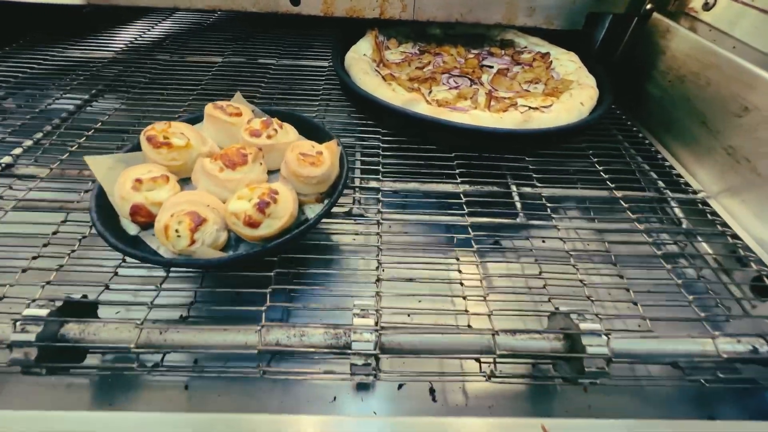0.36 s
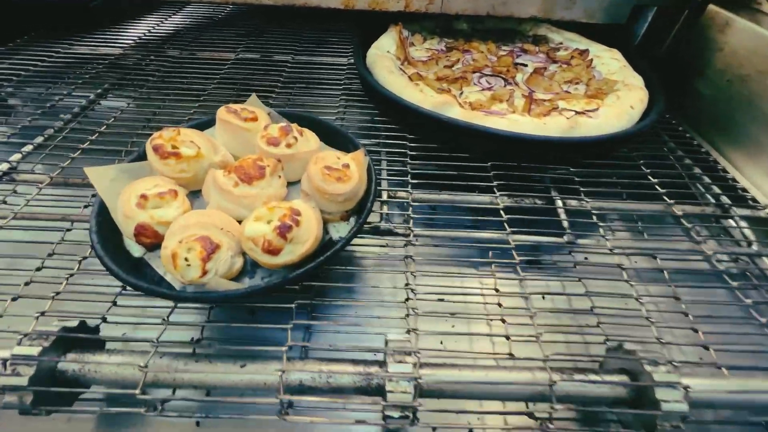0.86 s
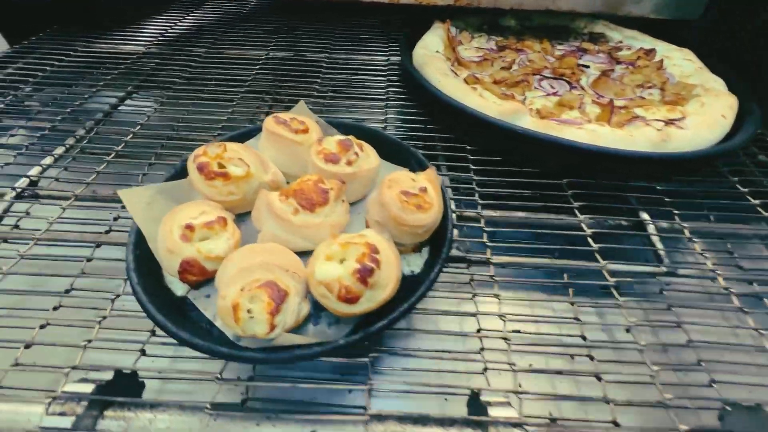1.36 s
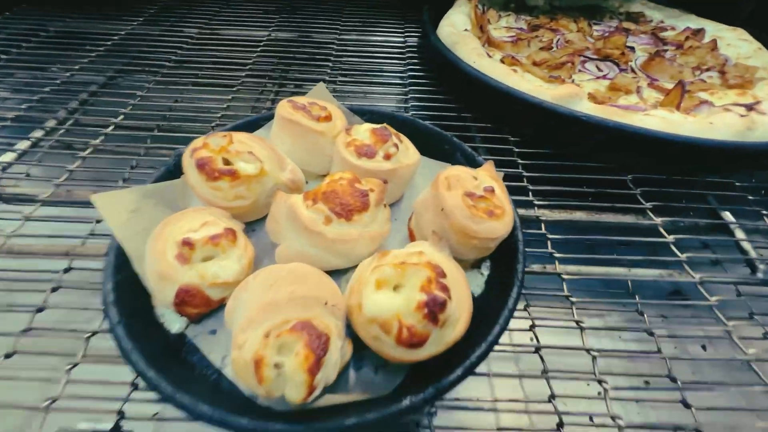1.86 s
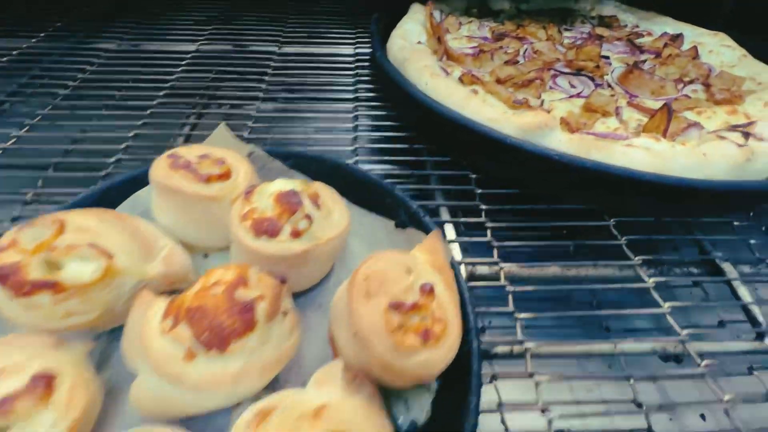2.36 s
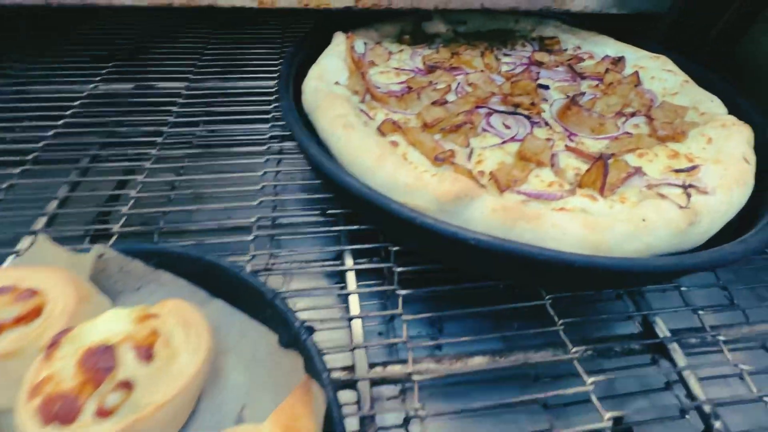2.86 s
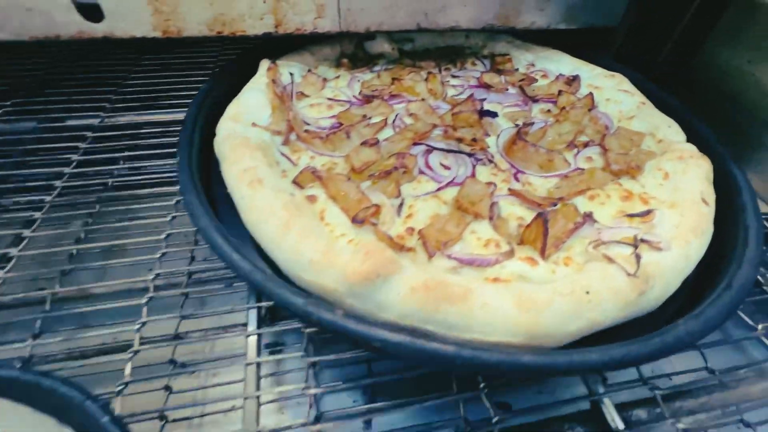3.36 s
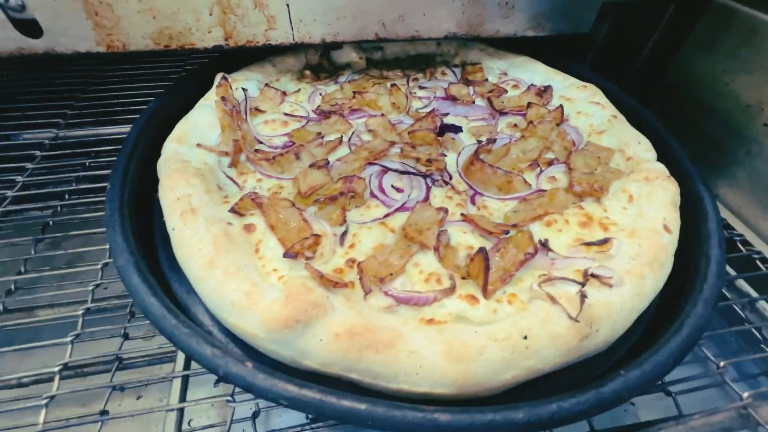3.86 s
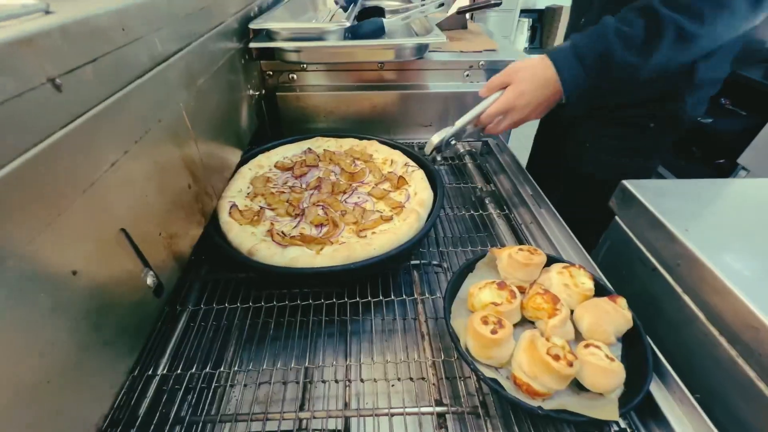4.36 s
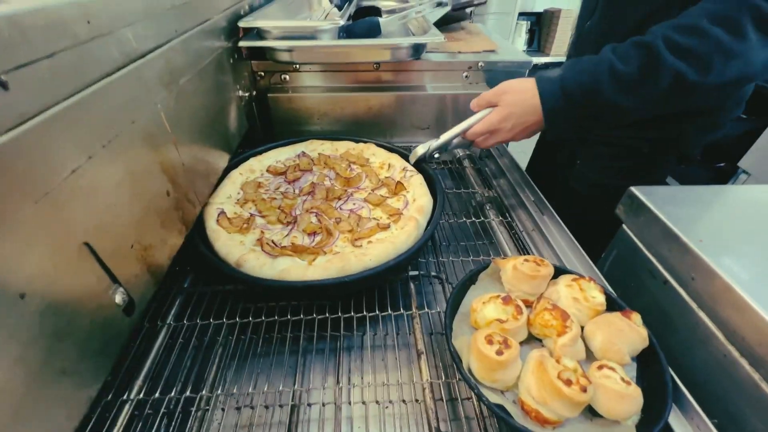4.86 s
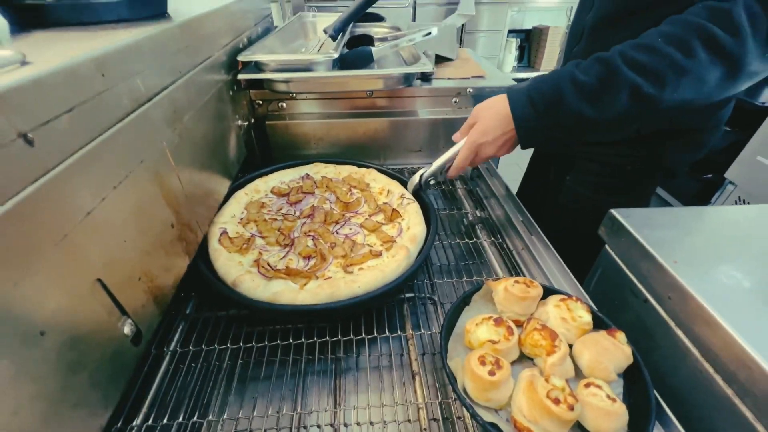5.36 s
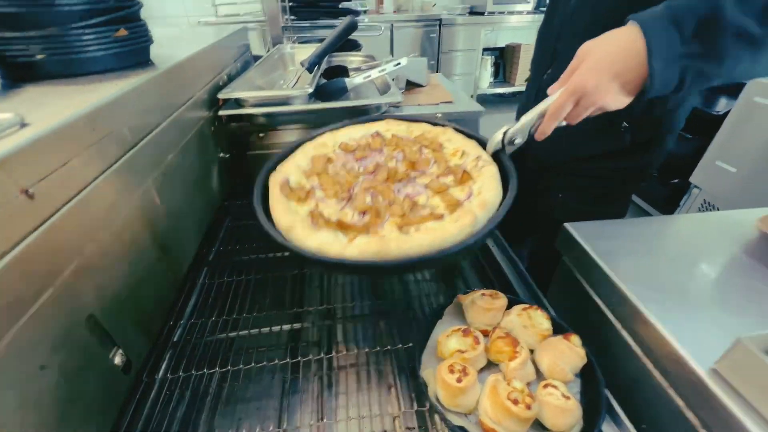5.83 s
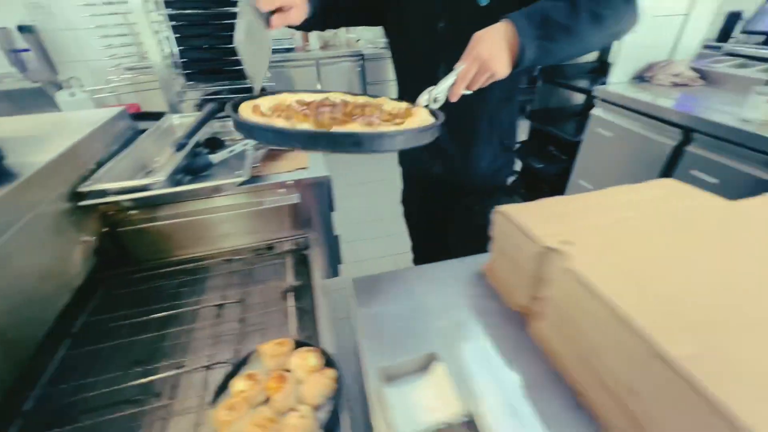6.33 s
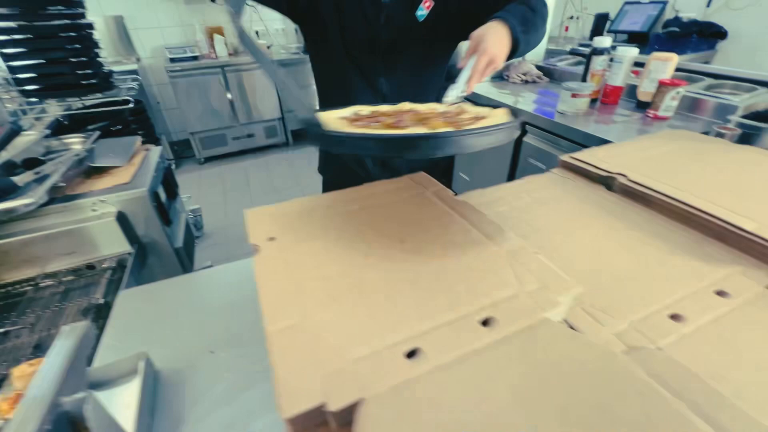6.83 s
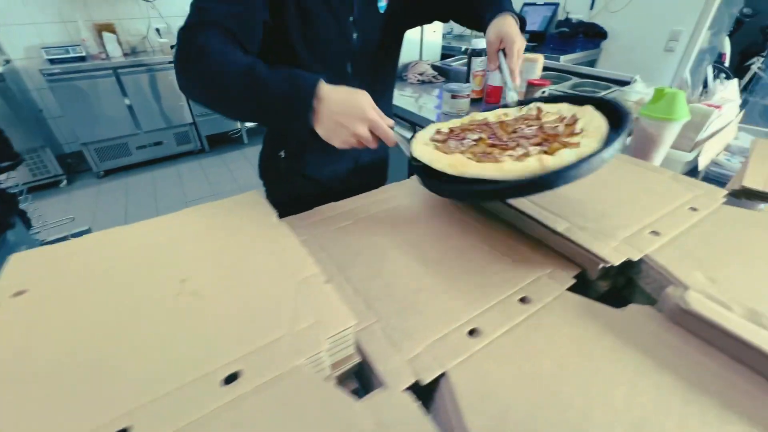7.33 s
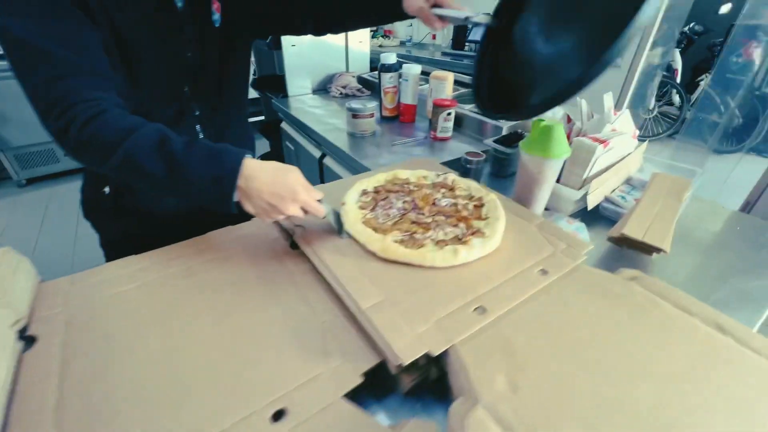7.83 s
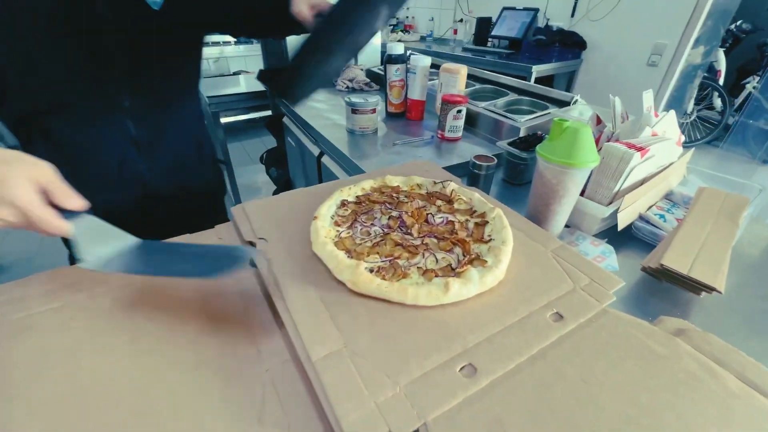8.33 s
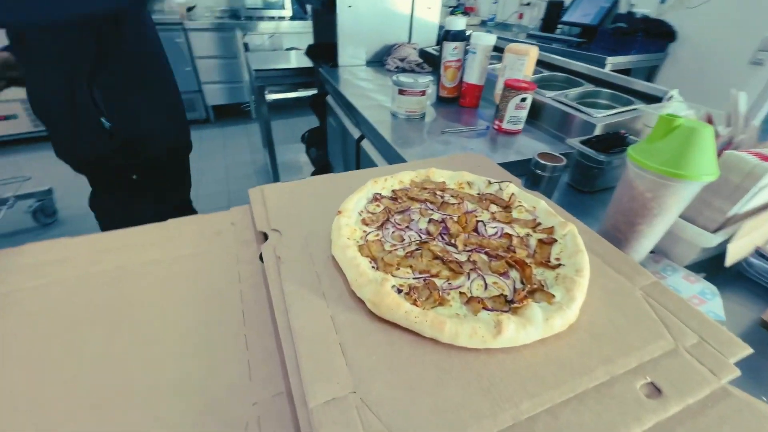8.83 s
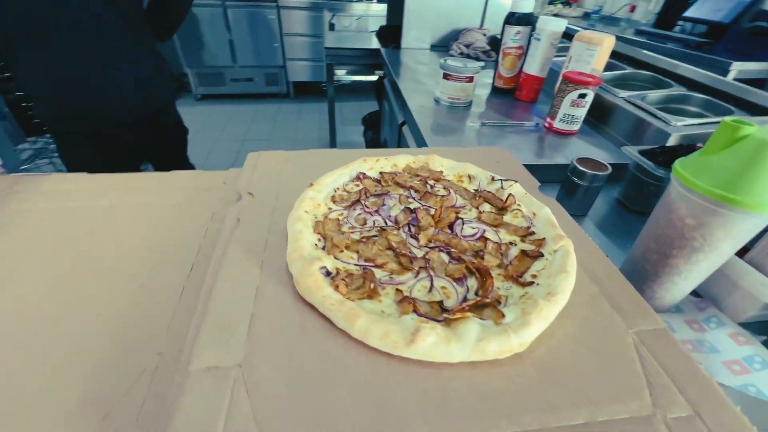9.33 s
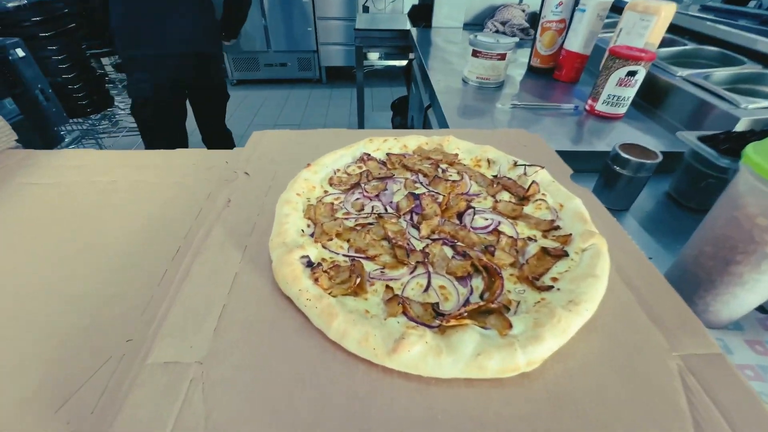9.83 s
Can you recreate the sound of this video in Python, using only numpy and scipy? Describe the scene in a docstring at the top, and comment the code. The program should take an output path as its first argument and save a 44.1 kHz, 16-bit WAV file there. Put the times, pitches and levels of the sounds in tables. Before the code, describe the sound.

Close to a conveyor oven, a blower roars with a low steady blade hum and hissing hot air, swelling as the microphone nears. A sharp edit click jumps to a second view; tongs clink and rattle on a pan, metal scrapes, a pizza lands on cardboard with a clack, and the oven drops back in a hard-surfaced kitchen.

```python
"""Conveyor oven and pizza tools

A hand-held camera with two microphone ports drifts close along the belt of a conveyor oven, then walks away.
The blower roars as shaped noise, its blades hum near 230 Hz, the air jets hiss, and thin high tones whine.
Steel tools click as short decaying modes and noise; knocks are damped tones; drags and chatter are grainy noise.
A short room tail answers the clicks and knocks. One edit splices two shots: a click, then a quick fade in."""
import sys
import numpy as np
from scipy import signal
from scipy.fft import rfft, irfft, next_fast_len
from scipy.io import wavfile
from scipy.ndimage import uniform_filter1d, map_coordinates

SR = 44100
rng = np.random.default_rng(int(sys.argv[2]) if len(sys.argv) > 2 else 0)


def store_wav(level_fs):
    """Save 16-bit WAV to argv[1]."""
    pcm = np.round(np.clip(np.atleast_2d(level_fs), -1, 1) * 32767)
    wavfile.write(sys.argv[1], SR, pcm.T.astype(np.int16))


def ratio_of_db(decibels):
    """Turn decibels (scalar or array-like) into linear amplitude factors; 0 dB maps to 1."""
    return 10 ** (np.asarray(decibels, float) / 20)


N = 438354
T = np.arange(N) / SR

# Blower roar at six camera places, before the gain of the walk. Each row: frequency in Hz, left and right
# density in dB per Hz, likeness of the ports 0-1, left lead in rad.
BELT_END = [(303, -51, -45.5, 1, -1), (390, -58.5, -57.5, 0.5, -0.3), (450.0, -55, -53, 0.55, -0.7),
            (597, -59.5, -51.5, 0.9, -0.9), (693, -66.5, -53.5, 0.5, 1.5), (843, -60, -55.5, 0.65, 1.8),
            (1040, -58.5, -66, 0.84, 1.5), (1320, -58, -60, 0.15, 2.0), (1570, -67, -70, 0.84, 1),
            (1900, -64, -61.5, 0.63, 3.5), (2240, -58, -64, 0.83, 3.5), (2550, -72, -68, 0.53, 3),
            (2960, -69, -73.5, 0.35, 1), (3780, -77, -74, 0.8, 2.5)]
PAN_EDGE = [(314, -51, -47, 0.98, -0.6), (380, -53, -56.5, 0.31, -0.5), (460, -52.5, -48.5, 1, -0.4),
            (550, -58.5, -49.5, 0.65, -1.8), (704, -60, -50.5, 0.11, 3), (870, -61.5, -55.5, 0.44, 1),
            (1060, -58.5, -59.5, 0.49, 2.5), (1290, -61, -61.5, 0.67, 3), (1540, -63, -62.5, 0.48, 3),
            (1810, -59.5, -57.5, 0.25, 3.5), (2190, -57, -68, 0.42, 3.0), (2550, -70.5, -70, 0.21, 2.5),
            (3130, -70, -72, 0.04, 5), (3810, -76, -74, 0.24, 3)]
OVEN_MOUTH = [(316.4, -47, -42.5, 0.72, 0), (367, -58, -54, 0.56, -1.5), (422, -52.5, -47, 0.87, -0.3),
              (543, -61, -50.5, 0.85, -1.3), (690, -64, -52.5, 0.18, 1.7), (875, -59, -59, 0.52, 4),
              (1040, -66.5, -64, 0.85, 1), (1294, -52, -63, 0.68, 4), (1540, -62.5, -62.5, 0.1, 3.5),
              (1880.0, -63, -60.5, 0.43, 3.5), (2190, -57, -63.5, 0.7, 3.5), (2590, -74, -67, 0.12, 1),
              (3220, -69, -74, 0.18, 6.5), (3880, -82, -71.5, 0.09, 3.5)]
BELT_SIDE = [(307.5, -62, -46, 0.95, 0.1), (382, -62, -53.5, 0.96, -0.3), (480, -58, -49, 0.94, -2),
             (577, -63.5, -56.5, 0.5, 2.1), (715, -56.5, -51.5, 0.96, 2.0), (880, -60, -63, 0.82, 4),
             (1060, -61.5, -60, 0.64, 2), (1357, -54, -60, 0.63, 2), (1500, -63.5, -60, 0.64, 3),
             (1890, -59.5, -59.5, 0.73, 4), (2180, -58.5, -59, 0.77, 3), (2570, -68, -72, 0.15, 4.5),
             (3170, -74.5, -74, 0.69, 5), (3780, -74, -77.5, 0.18, 1)]
TURNING = [(303, -52.5, -53, 0.8, -0.5), (380.0, -59, -58, 0.57, 0), (445, -62, -54, 1, 0),
           (577, -62, -55.5, 0.83, 2), (707, -58.5, -56, 1, 1.5), (865, -59.5, -60.5, 0.98, 3.5),
           (1030, -62.5, -62, 0.86, 2.5), (1230, -62, -70, 0.93, 4), (1570, -64.5, -60.5, 0.95, 3.5),
           (1860, -61, -64, 1, 4.5), (2310, -69, -68.5, 0.57, 4), (2600, -73, -84, 0.29, 3),
           (3200.0, -78.5, -76, 0.06, 7.5), (3810, -74.5, -85, 0.22, 8.5)]
BENCH = [(304, -59, -52, 0.78, -0.5), (357, -62.5, -63, 0.69, -0.5), (460, -64.5, -56.5, 0.34, 0.6),
         (550, -71, -66, 0.54, 1.9), (720, -65, -64, 0.84, 2.5), (870.0, -67.5, -66.5, 0.68, 2.5),
         (1080, -72, -71, 0.59, 3), (1307, -64.5, -66.5, 0.86, 3), (1560, -84.5, -78.5, 0.84, 7.5),
         (1880, -67, -70.5, 1, 4), (2130, -69.5, -70, 0.26, 3.5), (2510, -79, -81, 0.11, 8),
         (3250, -82.5, -83.5, 0.16, 1.3), (3800.0, -83, -89, 0.3, 5)]
# Path of the camera. Each row: time in seconds, place 0-5 in the order above, gain on the oven's sounds in dB.
WALK = [(0, 0, 0.2), (1.3, 0.1, 0.85), (2.2, 1, 0.3), (2.6, 1.1, 0.7), (3.1, 2, -0.76), (4.19, 2, -0.5),
        (4.2, 3, 1), (5.9, 3, -0.33), (6.2, 3.95, 1), (6.4, 4, 1.5), (6.6, 4, -0.5), (7.25, 4.15, -0.8),
        (7.9, 5, 0.3), (9.94, 5, 0.1)]
# Rumble and jets, one row a place. Each row: rumble gain in dB, jet gain in dB,
# jet brightness in roughly dB per octave.
PLACE_GAINS = [(-0.5, 0.1, 1.2), (2.3, 0.7, -0.5), (3, 0.5, 0.7), (0.6, 1.1, -1.6), (-5, -3, 0),
               (-8, -8, 2.5)]
# Duct rumble before the gains of place and walk. Each row: frequency in Hz, left and right density in dB per Hz.
RUMBLE = [(40.2, -73, -74), (60.0, -57.5, -63), (83, -52.5, -53), (124.6, -52, -57), (219, -44, -45.5),
          (303.4, -50.5, -50.5)]
# Blade tone, one row a place, before the gain of the walk. Each row: frequency in Hz, level in dB,
# left-right difference in dB, left lead in rad.
BLADES = [(229.3, -21.5, 0.5, -0.79), (231.3, -18.5, 0.5, -0.76), (232.05, -18, 1.6, -0.7),
          (231.6, -20.8, -0.8, -0.62), (230, -26.5, 0.6, -0.13), (231.8, -31.5, 2.5, -0.03)]
# Air jets over the belt, before the gains of place and walk. Each row: frequency in Hz,
# left and right density in dB per Hz.
JETS = [(3860, -78, -79.5), (4500, -79.5, -80.5), (6460, -82, -85.5), (7970, -85, -88.5),
        (8900, -96.5, -92.5), (10600, -95, -90), (12200, -95.5, -85.5), (13400, -101, -99),
        (13600, -106, -106), (15300, -104, -104), (16100, -108, -108)]
# Steel contacts. Each row: time in seconds, relative level in dB, left-right difference in dB,
# t60 of the rattle in seconds (5 ms at least), brightness in dB per octave.
TAPS = [(3.7369, -29, -2.5, .02, 6), (3.93, -33, -.5, .03, 12), (3.9649, -26, 0, .015, -2),
        (4.393, -22, -.5, .06, 0), (4.4134, -30, 1, .05, -4), (4.7257, -29, -2, .03, 5),
        (4.994, -24, 1.5, .015, -7), (5.0155, -14, -2, .06, 7), (5.073, -17.5, 1, 0.065, -4),
        (5.152, -18, -2, .08, 0), (5.2004, -22, 1.5, 0.033, -16), (5.466, -19, 3, 0.088, -4),
        (6.6325, -22, 2, 0.048, 5), (7.5595, -35, -8, .04, 11), (7.5774, -31, -5, .04, .1),
        (7.71, -25, -5, .025, -3), (7.7245, -32, -3, 0.011, -4.5), (7.7283, -12.5, 1, 0.01, -5),
        (9.8819, -27, 3, .06, -7), (9.901, -24, 1, .06, -2)]
# Modes of tongs and pan, varied at each contact. Each row: frequency in Hz, relative level in dB,
# own t60 in seconds.
STEEL_MODES = [(4910, -9.5, 0.088), (5730, -1, 0.15), (6260, -1.5, 0.042), (7390, -7, 0.14),
               (8000, -15, 0.072), (9700, -6, 0.072), (10840, -9, .06), (11100, -8, 0.046),
               (12900, -9, .035), (15300, -16, .04)]
# Dull knocks of pan and board. Each row: time in seconds, relative level in dB, body frequency in Hz,
# t60 in seconds.
KNOCKS = [(4.3948, -25, 1605, 0.098), (5.468, -25, 1320, 0.06), (7.7245, -32, 3050, .02),
          (7.7275, -26, 1340, .02), (7.7275, -27, 650, .03), (7.736, -20, 257, 0.073),
          (9.889, -32, 1270, .04), (9.912, -30, 1210, .05), (9.914, -36, 2400, .04),
          (9.928, -31, 1290, .05)]
# Colour of steel contact noise. Each row: frequency in Hz, relative density in dB.
RASP = [(800, -28), (1300, -2.5), (2500, -4.5), (3200, -7.5), (5500, -2.5), (7500, -1), (8800, -8),
        (10500, -4), (12000, -3.5), (13500, -12), (15200, -9), (16000, -16)]
# The tool chatters on after a blow. Each row: time of full level in seconds, relative level in dB,
# starting brightness from -4 (all dull) to 4 (all bright).
CHATTER = [(4.396, -31.5, -2), (5.018, -29.5, -2.5), (5.148, -34.5, -2.8), (5.466, -29.5, -2.5),
           (7.56, -41, 4.5), (7.73, -46, 0)]
# Drags of tongs and spatula. Each row: start in seconds, length in seconds, relative level in dB,
# brightness on the scale of the chatter.
DRAGS = [(4.32, 0.064, -52, -2), (4.445, 0.062, -54, -1.5), (4.866, .2, -46, -1), (5.5, .12, -52, 1),
         (6.7, 0.2, -55, 1), (6.878, 0.37, -45.5, 3.9), (7.68, .07, -48, -9), (8.03, 0.25, -47, -2.3),
         (9.865, 0.13, -39, -3.5)]
# Treble at the two microphone ports. Each row: frequency in Hz, left-right difference in dB,
# likeness 0-1, left lead in rad.
PORTS = [(300, 6, 0.6, 9.4), (3000, -0.5, 0, 6.5), (8400, 3, 0.1, 6.5), (8930, 0, 0.3, 8.3),
         (10500, -8.5, 0.1, 11.3), (11900, -11.5, 0.4, 15.3), (13500, -1, 0.8, 16), (15200, 2, .95, 18.9),
         (16300, 0.1, .95, 18.9)]
# Steady far motor whine. Each row: frequency in Hz, relative level in dB.
WHINE = [(12118, -72), (12279, -70), (12441, -79), (12597, -85), (12758, -87)]
# Decay of the kitchen. Each row: frequency in Hz, t60 in seconds.
KITCHEN = [(300, .4), (3000, .3), (12000, .15)]

SPLICE_S, FADE_IN_S, TOP_HZ, CREST = 4.1978, .022, 16000, .32  # CREST: amplitude at the cut
WHISTLE_S, WHISTLE_RISE_S, WHISTLE_HZ, WHISTLE_SAG_HZ = 3.52, .12, 13850, 25
WHISTLE_DB, FLICKER_DB = -67, 4.5  # level before panning, size of the random flicker
CHATTER_ATTACK_S, CHATTER_T60_S, CHATTER_LENGTH_S = 0.0052, 0.19, .4
DULLING_PER_S = 46  # fall of the chatter's brightness
DRAG_SWELL = 1.3  # power of the half sine that shapes a drag


def unit(x):
    """Scale to rms 1."""
    return x / np.sqrt(np.mean(x ** 2) + 1e-20)


def along(f, v, hz):
    """Values v at frequencies f, read on a log axis."""
    return np.interp(np.log(hz + 1), np.log(np.add(f, 1)), v)


def wobble(rate):
    """A smooth random curve, rate knots a second."""
    return map_coordinates(rng.standard_normal(int(N * rate / SR) + 4), [T * rate])


def filtered(x, response):
    """x times a complex response of frequency."""
    m = next_fast_len(x.shape[-1] + 8192)
    return irfft(rfft(x, m) * response(np.fft.rfftfreq(m, 1 / SR)), m)[..., :x.shape[-1]]


def sides(db):
    """Left and right gains for a left-right level difference."""
    return ratio_of_db(np.array([db / 2, -db / 2]))


def walk(table):
    """Camera place, gain in dB and the columns of a table with one row a place, at every moment."""
    s, places, gains = np.transpose(WALK)
    place = np.interp(T, s, places)
    gain_db = np.interp(T, s, gains)
    return place, gain_db, [np.interp(place, np.arange(len(table)), c) for c in np.transpose(table)]


def eddies(patchy_db):
    """Two white noises of 0 dB per Hz with shared patches of random gain over time and frequency."""
    z = signal.stft(rng.standard_normal((2, N)), nperseg=512)[2]
    field = uniform_filter1d(rng.standard_normal(z.shape[1:]), size=5, axis=0)
    field = uniform_filter1d(field, size=12, axis=1)
    patchy = signal.istft(z * ratio_of_db(patchy_db * unit(field)), nperseg=512)[1][:, :N]
    return unit(patchy) * np.sqrt(SR / 2)


def at_ports(pair, table):
    """Spectrum pair of two noises as the ports hear it: each side's colour, a shared part and a phase lead."""
    hz = np.fft.rfftfreq(2 * pair.shape[1] - 2, 1 / SR)
    f, left_db, right_db, alike, lead = np.transpose(table)
    alike = np.clip(along(f, alike, hz), 0, 1)
    left = ratio_of_db(along(f, left_db, hz)) * np.exp(1j * along(f, lead, hz)) * pair[0]
    right = ratio_of_db(along(f, right_db, hz)) * (alike * pair[0] + np.sqrt(1 - alike ** 2) * pair[1])
    inside = (hz >= f[0]) * (hz < f[-1])
    return irfft(inside * np.array([left, right]))[:, :N]


def ported(pair):
    """Treble reaches the two ports partly alike, with the colour and phase of the camera's body."""
    table = [(hz, db / 2, -db / 2, alike, lead) for hz, db, alike, lead in PORTS]
    spectrum = rfft(pair, 2 * next_fast_len(pair.shape[1] // 2 + 512))
    return at_ports(spectrum, table)[:, :pair.shape[1]]


def tilted(x, db_per_octave):
    """Brighter or duller about 8 kHz, with the bass rolled off."""
    return filtered(x, lambda hz: ratio_of_db(db_per_octave * np.log2((hz + 500) / 8000))
                    * (1j * hz / (1500 + 1j * hz)) ** 2)


def rasp_colour(hz):
    """Spectrum of steel contact noise."""
    return ratio_of_db(along(*np.transpose(RASP), hz))


def roar():
    """Blower turbulence reaches both ports; colour, likeness and lead change with the camera's place."""
    pair = rfft(eddies(patchy_db=1.3), 2 * next_fast_len(N // 2 + 4096))
    shift = np.exp(.7j * np.arange(pair.shape[1]))  # a long time shift makes the noise at each place its own
    place, gain_db, heard = walk(PLACE_GAINS)
    body = np.zeros((2, N))
    for k, table in enumerate([BELT_END, PAN_EDGE, OVEN_MOUTH, BELT_SIDE, TURNING, BENCH]):
        nearness = np.clip(1 - abs(place - k), 0, 1) ** .5  # equal-power crossfade between places
        body += nearness * at_ports(pair * shift ** k, table)
    rumble_table = [(hz, left, right, .97, -hz / 480) for hz, left, right in [(15, -90, -91)] + RUMBLE]
    rumble = at_ports(pair, rumble_table)
    return body * ratio_of_db(gain_db + 0.82 * wobble(2.92)) + rumble * ratio_of_db(gain_db + heard[0])


def blades():
    """The blade-passing tone, slightly unsteady in strength and phase; the splice falls on one of its crests."""
    _, gain_db, (hz, db, pan_db, lead) = walk(BLADES)
    phase = 2 * np.pi * np.cumsum(hz) / SR + 0.15 * wobble(6)
    phase = phase - phase[round(SPLICE_S * SR)]
    tone = np.cos(phase + np.array([lead / 2, -lead / 2]))
    unsteady_db = .8 * wobble(5) + .9 * wobble(14)
    return np.sqrt(2) * ratio_of_db(db + gain_db + unsteady_db) * sides(pan_db) * tone


def jets():
    """Hot air hisses through the nozzles, duller or brighter as the camera turns."""
    f, left_db, right_db = np.transpose(JETS)
    port_hz, _, port_alike, port_lead = np.transpose(PORTS)
    alike = 0.86 * along(port_hz, port_alike, f)
    table = np.transpose([f, left_db, right_db, alike, along(port_hz, port_lead, f)])
    hiss = at_ports(rfft(eddies(patchy_db=1.2), 2 * next_fast_len(N // 2 + 4096)), table)
    _, gain_db, (_, level_db, tilt_db) = walk(PLACE_GAINS)
    octaves = filtered(hiss, lambda hz: np.log2((hz + 1) / 6000))
    # first-order tilt about 6 kHz, so that it can change from moment to moment
    return (hiss + np.log(10) / 20 * tilt_db * octaves) * ratio_of_db(level_db + gain_db)


def taps():
    """Each contact: a crack, a short rattle of noise and the steel's modes at new strengths."""
    out, t = np.zeros((2, N + SR)), np.arange(SR // 8) / SR
    for s, db, pan_db, t60, tilt_db in TAPS:
        fade = ratio_of_db(-60 * t / max(t60, .005))
        ring = np.zeros(len(t))
        for hz, level, decay in STEEL_MODES:
            strength = ratio_of_db(level + rng.normal(0, 1.6) - 60 * t / decay)
            ring += strength * np.sin(2 * np.pi * hz * rng.normal(1, 0.012) * t)
        rattle = unit(filtered(rng.standard_normal((2, len(t))), rasp_colour))
        crack = 1.6 * ratio_of_db(-60 * t / 0.0046) * rng.standard_normal((2, len(t)))
        contact = 0.49 * np.sqrt(fade) * ring + 1.06 * fade * rattle + crack
        steel = ported(tilted(contact, tilt_db))
        steel = filtered(steel, lambda hz: (1j * hz / (2600 + 1j * hz)) ** 2)  # thin steel radiates no low mids
        out[:, round(s * SR):][:, :len(t)] += sides(pan_db)[:, None] * ratio_of_db(db - 9.5) * steel
    return out[:, :N]


def knocks():
    """Soft blows wake one broad body resonance each, a close pair so that it does not ring like glass."""
    out, t = np.zeros(N + SR), np.arange(SR // 5) / SR
    for s, db, hz, t60 in KNOCKS:
        second = .5 * np.sin(2 * np.pi * hz * rng.normal(1.07, 0.019) * t)
        body = np.sin(2 * np.pi * hz * t) + second
        soft_start = 1 - np.exp(-t / 0.00068)
        out[round(s * SR):][:len(t)] += ratio_of_db(db - 60 * t / t60) * soft_start * body
    return out[:N]


def chatter_shape(t):
    """A tool bouncing after a blow: quick rise, exponential decay."""
    return np.minimum(t / CHATTER_ATTACK_S, 1) ** 2 * ratio_of_db(-60 * t / CHATTER_T60_S)


def strokes():
    """Steel drags and chatters over pan, crust and cardboard: clumped grains, a mix of dull and bright."""
    grit = eddies(patchy_db=3.0) * ratio_of_db(1.4 * wobble(400) + 1.2 * wobble(67))
    rasp = unit(ported(filtered(grit, rasp_colour)))
    dull, bright = unit(tilted(rasp, -9)), unit(tilted(rasp, 5.6))
    dull_gain, bright_gain = np.zeros((2, N))

    def add(s, length, db, shape, brightness):
        span = slice(round(s * SR), round(s * SR) + int(length * SR))
        t = np.arange(len(T[span])) / SR
        share = np.clip(.5 + brightness(t) / 8, 0, 1)
        dull_gain[span] += ratio_of_db(db) * shape(t) * (1 - share)
        bright_gain[span] += ratio_of_db(db) * shape(t) * share

    for s, db, bright_start in CHATTER:
        add(s - CHATTER_ATTACK_S, CHATTER_LENGTH_S, db, chatter_shape,
            lambda t: bright_start - DULLING_PER_S * t)
    for s, length, db, steady in DRAGS:
        add(s, length, db, lambda t: np.sin(np.pi * t / length) ** DRAG_SWELL, lambda t: steady)
    return ratio_of_db(5.0) * (dull_gain * dull + bright_gain * bright)


def whines():
    """Thin high tones, stronger at the right port; the whistle swells in, settles in pitch and flickers."""
    motor = np.zeros(N)
    for hz, db in WHINE:
        motor += ratio_of_db(db - 5 + 3 * wobble(3)) * np.sin(2 * np.pi * hz * T + .6 * wobble(8))
    grown = np.clip((T - WHISTLE_S) / WHISTLE_RISE_S, 0, 1)
    whistle_hz = WHISTLE_HZ + WHISTLE_SAG_HZ * (1 - grown) + 45 * wobble(70)
    strength = grown * (T < SPLICE_S) * ratio_of_db(WHISTLE_DB + FLICKER_DB * wobble(45))
    whistle = strength * np.sin(2 * np.pi * np.cumsum(whistle_hz) / SR)
    return np.sqrt(2) * (np.outer(sides(-14), motor) + np.outer(sides(-13), whistle))


def kitchen(x):
    """Steel and tiles answer with a noise tail; each frequency dies at its own speed."""
    hz, t, z = signal.stft(rng.standard_normal((2, SR // 4)), SR, nperseg=256)
    decay = ratio_of_db(-60 * t / along(*np.transpose(KITCHEN), hz)[:, None])
    tail = signal.istft(z * decay, SR, nperseg=256)[1]
    return signal.fftconvolve(x, tail / np.linalg.norm(tail[0]), axes=1)[:, :N]


def scene():
    """Oven, handling and room."""
    handling = taps() + knocks()
    oven = roar() + blades() + jets() + whines()
    return oven + strokes() + handling + ratio_of_db(-13) * kitchen(handling)


def band_limit(x):
    """A steep low-pass at the top of the band."""
    return signal.sosfilt(signal.butter(12, 16820, fs=SR, output="sos"), x)


def record(dry):
    """The first shot stops dead on a high crest, which clicks; the second fades in; the top is band-limited."""
    last = dry[:, [int(SPLICE_S * SR)]]
    pull = np.exp(np.minimum(T - SPLICE_S, 0) / .0008) * (T < SPLICE_S)  # bends the last moments to the crest
    dry = dry + (CREST - last) * pull
    edit = np.where(T < SPLICE_S, 1, np.clip((T - SPLICE_S) / FADE_IN_S, 0, 1))
    mix = filtered(dry * edit, lambda hz: 1 / (1 + (hz / TOP_HZ) ** 60))
    return band_limit(mix)


dry = scene()
out = record(dry)
store_wav(out)
```